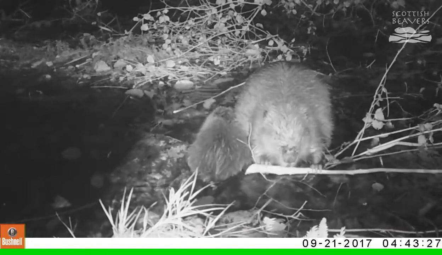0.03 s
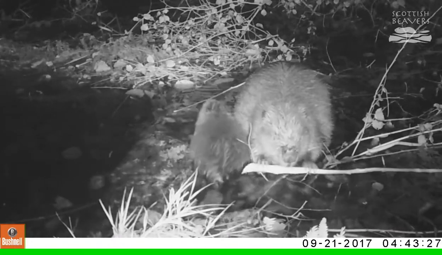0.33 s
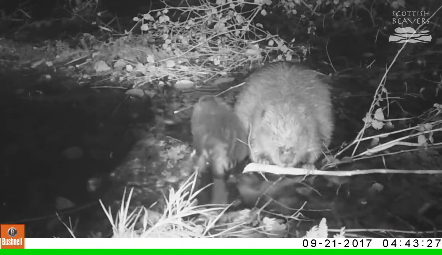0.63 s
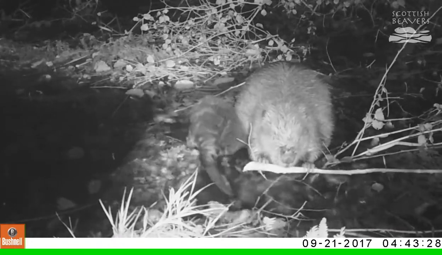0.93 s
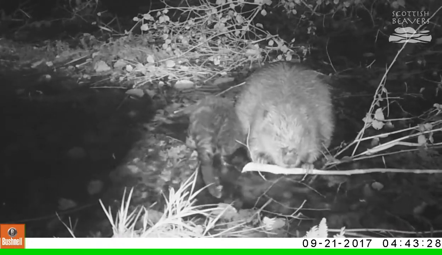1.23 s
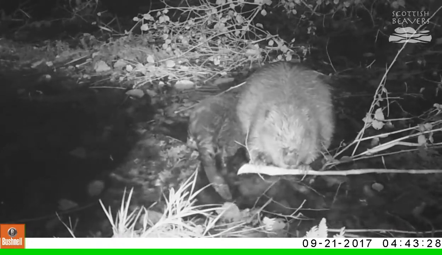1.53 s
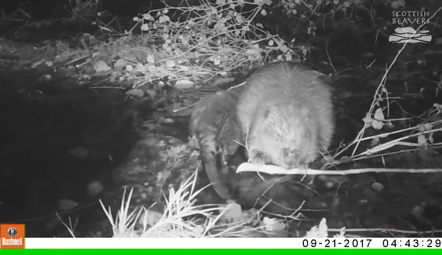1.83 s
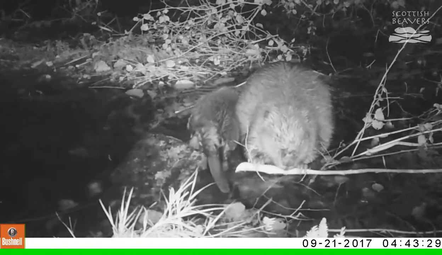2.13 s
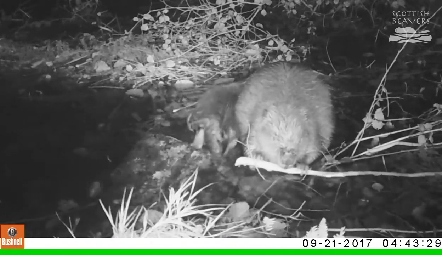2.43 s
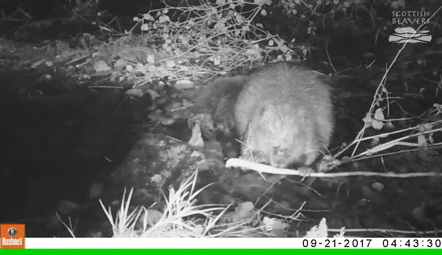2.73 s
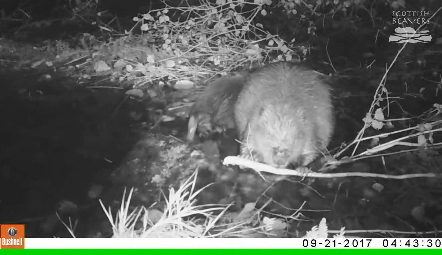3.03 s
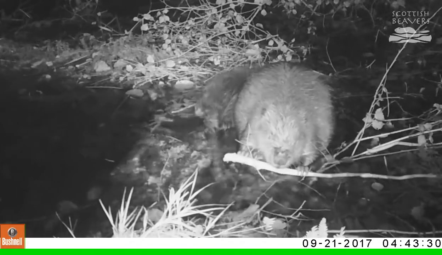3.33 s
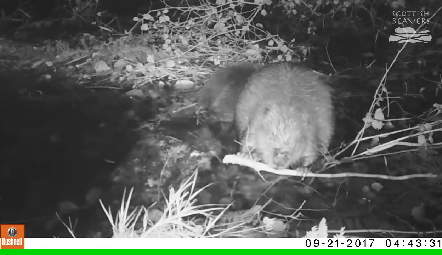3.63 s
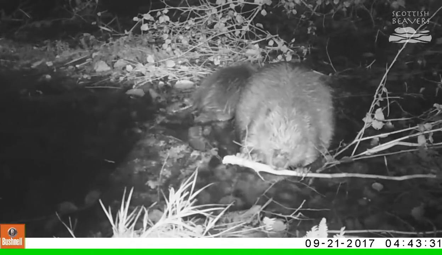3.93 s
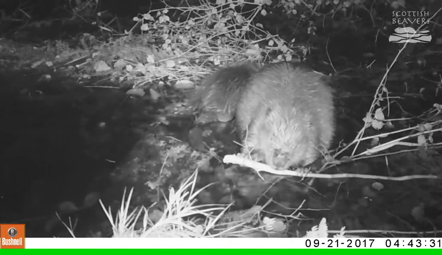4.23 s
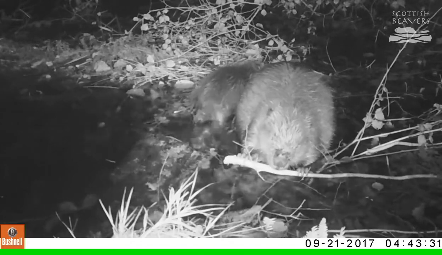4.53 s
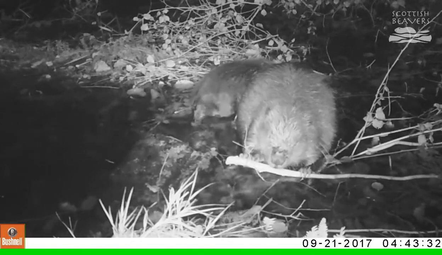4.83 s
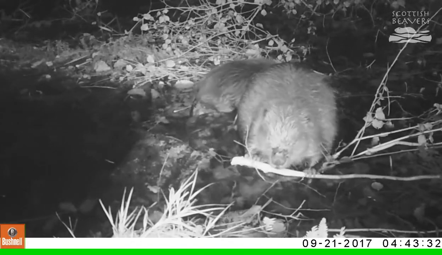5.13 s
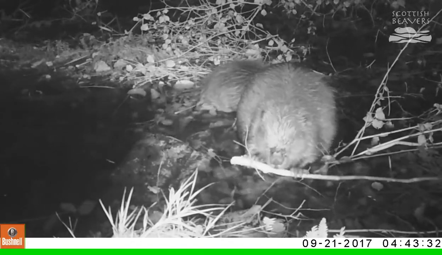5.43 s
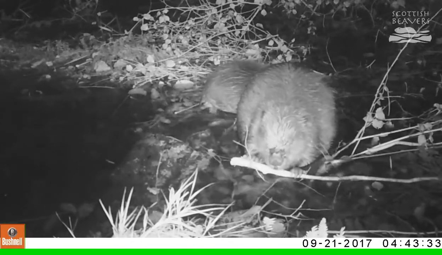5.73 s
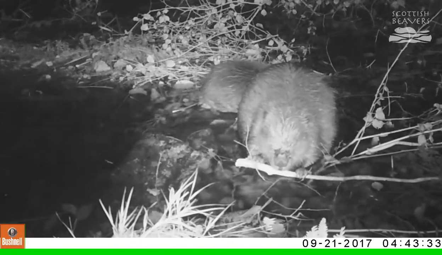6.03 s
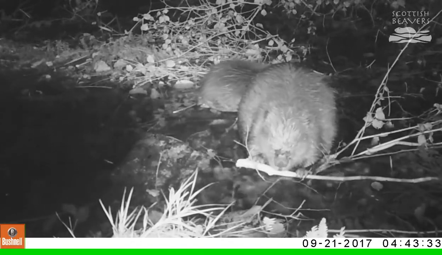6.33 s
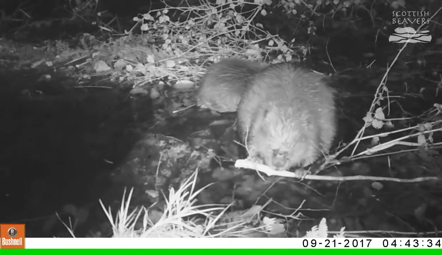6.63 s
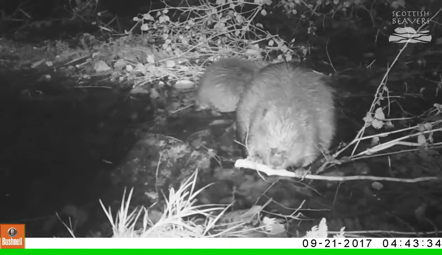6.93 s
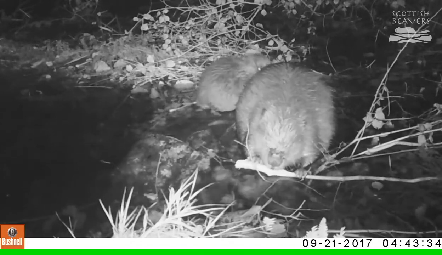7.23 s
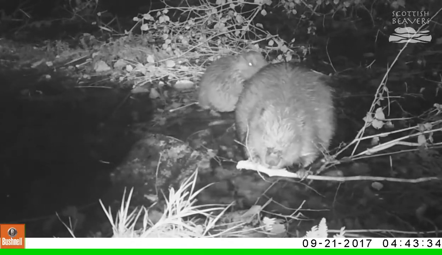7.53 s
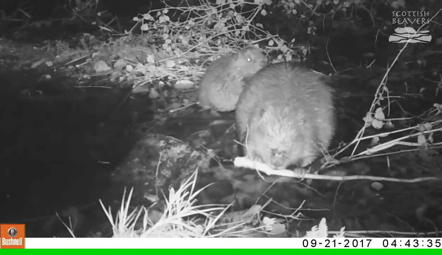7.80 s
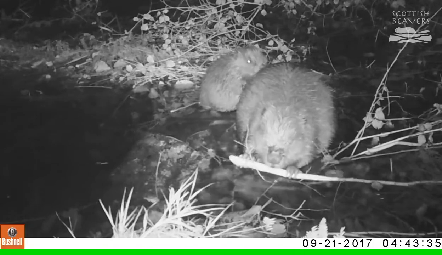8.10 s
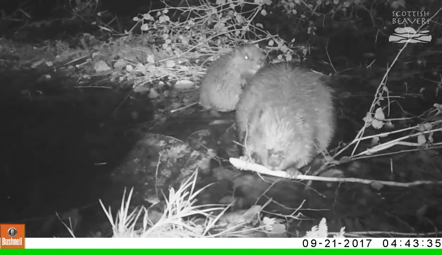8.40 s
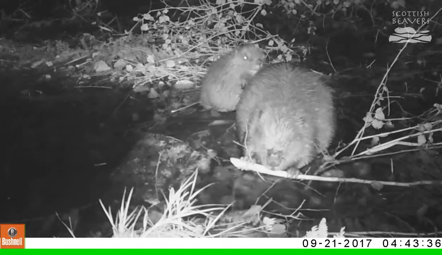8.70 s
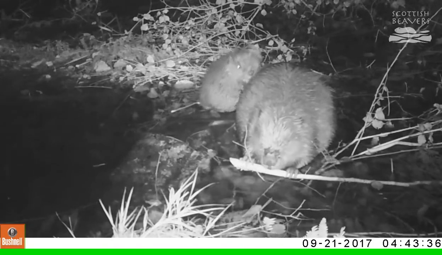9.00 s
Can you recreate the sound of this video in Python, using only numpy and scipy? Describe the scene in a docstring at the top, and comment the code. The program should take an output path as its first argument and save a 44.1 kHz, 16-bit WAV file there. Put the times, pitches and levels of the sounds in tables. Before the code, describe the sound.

A beaver gnaws a stick on a stream bank at night, a few metres from the microphone. First come scattered dry clicks, light tooth scrapes and small snaps of wood fibre. Midway there are three soft bumps and a brief tear of bark. Then the chewing settles into hollow, rasping bites, about five a second, each ending in a crisp chip. A steady low rumble and hiss lie under the quiet gnawing.

```python
"""A beaver gnaws a stick on a stream bank at night, a few metres away.
Its incisors first scrape, snap fibres and peel bark, then bite about five times a second, each bite a
rasp ending in a breaking chip. Slips and fractures ring the stick; slivers ring at their own pitch.
The bank scatters the gnawing faintly. Underneath: low rumble, steady hiss, three soft bumps."""
import sys
import numpy as np
from scipy import signal
from scipy.fft import rfft, irfft, next_fast_len
from scipy.io import wavfile

SR = 44100
rng = np.random.default_rng(int(sys.argv[2]) if len(sys.argv) > 2 else 0)


def wrap_up_sound(samples):
    """Save the sound to the file named by the first command line argument, as 16-bit audio."""
    columns = np.atleast_2d(samples).T
    # keep every value between -1 and 1, then stretch to whole-number steps
    tamed = np.clip(columns, -1, 1)
    steps = np.round(tamed * 32767).astype(np.int16)
    wavfile.write(sys.argv[1], SR, steps)


N = 408366

# night background spectrum (frequency [Hz], relative density [dB])
NIGHT_SPECTRUM = [(12, -2), (25, 1), (40, -1), (60, -4.5), (120, -10), (250, -16.5), (500, -24.5),
                  (1000, -32), (2000, -37), (4800, -41), (6300, -39.5), (7300, -40.5), (8900, -46),
                  (9400, -57), (10000, -56.5)]
# resonances of the stick in the jaws (frequency [Hz], width [Hz], gain [dB])
STICK_MODES = [(500, 99, 5.5), (786, 240, 4.5), (1190, 164, -1), (1397, 270, -2), (2304, 110, -5),
               (2605, 650, -3.5), (3225, 660, -2), (3630, 150, -3), (4130, 280, -2.5), (4800, 250, -3),
               (5765, 740, 4), (6480, 370, 5.5), (7660, 1050, 0.5), (8300, 1100, -6.5), (8950, 1700, -16)]
# centres of the knock, wood, tooth and edge bands (frequency [Hz])
BANDS_HZ = [1450, 3120, 6200, 8450]
# lone tooth scrapes (start [s], length [s], level before gain [dB], body [dB])
SCRAPES = [(0.114, 0.14, -76, -11), (0.291, 0.031, -61, 7), (0.384, 0.03, -63, -14),
           (0.456, 0.027, -63, -8), (0.847, 0.095, -65, -1), (1.155, 0.036, -59.5, 3),
           (1.828, 0.063, -60.5, -1), (2.193, .022, -58, 0), (2.634, 0.022, -61.5, 6),
           (2.885, 0.063, -59, 3), (3.679, 0.034, -57, 3), (4.031, 0.057, -62.5, 1), (4.096, 0.02, -59, 12),
           (4.12, 0.027, -60.5, -16), (4.238, 0.026, -60.5, -2), (5.099, 0.055, -57.5, 2.5),
           (5.36, 0.02, -59.5, 1), (5.565, 0.017, -55.5, -27), (5.869, 0.052, -57.5, 4),
           (6.019, 0.042, -61, 3), (7.978, 0.031, -64.5, -3)]
# slivers and twigs springing free (time [s], pitch [Hz], envelope peak [dB], decay [s])
SLIVERS = [(.1147, 6000, -40.5, .0006), (.2028, 5750, -43, .0006), (.3005, 1250, -44, .0006),
           (.4700, 1120, -37.5, 0.00058), (.6010, 4320, -35, 0.00072), (.6010, 5050, -35, 0.00054),
           (.8585, 3300, -42, .0004), (.8960, 1280, -45.5, .001), (2.0046, 550, -41, 0.0013),
           (2.0044, 1630, -28, 0.0007), (2.0044, 3220, -32, .0007), (2.0044, 2170, -34, 0.001),
           (2.0503, 5750, -23.5, 0.00042), (2.0508, 6600, -40, .0006), (2.0046, 4830, -39, .0005),
           (2.0505, 4060, -32, .00045), (2.5715, 6040, -28, 0.00041), (2.9350, 1020, -45, 0.0013),
           (3.5368, 6800, -41, 0.00054), (3.6245, 3450, -41.5, .0005), (4.8573, 2400, -39.5, 0.00052),
           (4.8575, 5650, -37, .0006), (4.8578, 6440, -33, .0006), (4.8615, 6370, -33, 0.00055),
           (4.936, 5300, -38, .0004), (5.2022, 1000, -36, 0.0011), (5.2028, 1450, -34.5, .001),
           (5.2034, 2560, -30, .0009), (5.2035, 4080, -36, .0007), (5.2033, 6340, -29.5, 0.0012),
           (5.209, 6600, -42, .0022), (8.429, 6250, -41, .0007), (8.4625, 6800, -40, .0007)]
# fibre snaps (time [s], 10 ms level before gain [dB], body [dB], edge [dB], splintering time [s])
CRACKS = [(0.3007, -51, -3, -14, 0.0018), (.4708, -52, 9, -14, .003), (0.5974, -47, 2, 7, .0006),
          (0.6012, -44.5, -2, 3, 0.0013), (.6057, -53, -4, 2, .0006), (.6115, -58, -3, -2, .001),
          (.6282, -54.5, -3, -7, .0008), (0.8596, -53, 4, -3, .004), (1.068, -56, -14, -4, .004),
          (1.8645, -46, 6, -13, 0.0033), (2.0047, -46, 2, -3, 0.002), (2.012, -53, -3, 1, .001),
          (2.051, -40, -10, -8, 0.0028), (2.0546, -47, -12, -6, .001), (2.060, -54, -10, -2, .003),
          (2.2, -48.5, -4, -13, .003), (2.25, -51.5, -12, -12, .003), (2.568, -47.5, 5, -4, 0.002),
          (2.572, -46, -1, -7, .0008), (2.5738, -49, -8, -8, .001), (2.804, -52, 0, -10, 0.0027),
          (3.263, -52, -2, -11, 0.0037), (3.342, -51.5, 6, -7, 0.0034), (3.591, -49, -10, 7, 0.0037),
          (3.6248, -52.5, 2, 0, 0.0032), (4.593, -50, 11, -4, 0.0027), (4.8582, -44.5, 8, -8, 0.003),
          (4.8625, -49, -7, -10, .002), (4.9365, -52, -2, -10, 0.001), (4.945, -41, -7, 10, .002),
          (4.952, -46.5, -7, 1, .0008), (5.2023, -46, -18, -12, .001), (5.2049, -41, -30, -12, .0015),
          (5.223, -54, -25, -20, .004), (5.8787, -49.5, 13, 1, .002), (6.097, -55, 2, -12, .002),
          (6.319, -50, 3, -6, 0.0018), (6.3306, -43.5, 5, -6, 0.0012), (6.3592, -46, -15, -12, 0.0032),
          (6.4862, -48.5, 0, -7, 0.0022), (6.573, -51, -4, -5, .004), (6.693, -53, -14, -2, .002),
          (6.933, -53.5, 9, -14, .002), (7.217, -50, -10, -10, .004), (7.620, -48.5, -12, -8, 0.00092),
          (7.864, -56, -14, -1, .002), (7.931, -52, -25, -8, .003), (8.231, -52.5, -22, -6, 0.0028),
          (8.383, -50, 4, -5, 0.0038), (8.428, -53, 1, -2, .0015), (8.4525, -50.5, -6, -1, .0015),
          (8.4925, -45.5, -9, -4.5, 0.0029), (8.506, -53, -11, 1, .003), (8.547, -49.5, 2, 3, 0.0018),
          (8.607, -48.5, 3, -6, .003), (8.778, -44.5, 1, 0, 0.0014), (8.825, -52, 2, -2, .002),
          (8.842, -50, 4, -2, .004), (8.985, -43.5, -3, -4, 0.0022)]
# soft bumps on the bank (time [s], pitch [Hz], envelope peak [dB], decay [s])
BUMPS = [(4.074, 250, -47, 0.0024), (4.111, 342, -39, 0.002), (4.255, 434, -40.5, 0.0026)]
# bark tears (time [s], peak before gain [dB])
TEARS = [(4.2893, -40), (4.2965, -41), (4.3037, -41), (4.32, -40), (4.332, -45), (4.3455, -33.5),
         (4.354, -38), (4.3675, -42), (4.3755, -42), (4.386, -42), (4.4085, -44)]
# resonances of the loose bark strip (frequency [Hz], width [Hz], gain [dB])
STRIP_MODES = [(2680, 260, 2), (3130, 220, -1.5), (5780, 300, 3.5), (6440, 140, 1)]
# bites (hardest push [s], half length [s], rasp before gain [dB], body [dB], chip time [s],
# chip before gain [dB], hollow pitch [ratio])
BITES = [(6.088, .015, -61, -3, 6.120, -45, 0.88), (6.31, 0.032, -56, -2, 6.337, -45.5, 0.82),
         (6.514, .025, -52.5, -0.5, 6.553, -44, 1.07), (6.729, 0.0097, -49.5, -2, 6.780, -45.5, 1.04),
         (6.959, 0.011, -49.5, 0, 6.998, -46, 0.94), (7.179, 0.021, -49.5, 1.5, 7.207, -48.5, 1.1),
         (7.387, 0.022, -49.5, 3.5, 7.421, -50.5, 1.02), (7.583, 0.021, -51, 0, 7.616, -49.5, 0.96),
         (7.784, 0.019, -49, 1, 7.806, -44.5, 0.98), (8.419, 0.01, -50, 0, 8.463, -55, 1.08),
         (8.586, .015, -55.5, 5, 8.629, -48, 0.84), (8.789, 0.014, -51, 4, 8.829, -47, 0.85),
         (8.994, 0.016, -48.5, 3, 9.042, -43, 0.91), (9.205, 0.016, -51, 2.5, 9.254, -47, 0.87)]
# hollow resonances of a deep bite (frequency [Hz], width [Hz], gain [dB])
HOLLOW_MODES = [(480, 110, -1.5), (770, 190, -6.5), (1230, 170, -10), (1480, 340, 0.5)]
# shaving under the teeth, ringing higher as the gnawing moves along (time [s], pitch [Hz])
SHAVING_PITCH = [(7.2, 3180), (8.6, 3670)]
# treble roll-off (frequency [Hz], gain [dB])
TREBLE_ROLLOFF = [(7800, 0), (8800, -1), (9400, -6), (10000, -12), (11000, -32.5)]


def undb(db):
    """Decibels to gain."""
    return 10 ** (np.asarray(db) / 20)


def add(track, sound, start_s):
    """Mix a sound into a track."""
    i = max(int(start_s * SR), 0)
    track[i:i + len(sound)] += sound[:max(len(track) - i, 0)]


def colour(x, points):
    """Filter by (frequency [Hz], gain [dB]) points on a log-frequency axis."""
    hz, db = np.transpose(points)
    n = next_fast_len(len(x))
    bins_hz = np.maximum(np.arange(n // 2 + 1) * SR / n, 1)
    gain = undb(np.interp(np.log(bins_hz), np.log(hz), db))
    return irfft(rfft(x, n) * gain, n)[:len(x)]


def walk(rate_hz, size):
    """Smooth random wander, spread near 1."""
    steps = np.arange(size) * rate_hz / SR
    knots = rng.standard_normal(int(steps[-1]) + 2)
    return np.interp(steps, np.arange(len(knots)), knots)


def night(level_db=-41.5, waver_db=0.35, waver_hz=18):
    """Steady low rumble under a barely wavering hiss."""
    noise = colour(rng.standard_normal(N), NIGHT_SPECTRUM)
    noise *= undb(level_db) / np.sqrt(np.mean(noise ** 2))
    rumble = colour(noise, [(150, 0), (900, -25)])
    hiss = noise - rumble
    return rumble + hiss * undb(waver_db * walk(waver_hz, N))


def fractures(rate_hz, spread_db, size):
    """Tiny random impulses: most weak, a few strong."""
    hits = rng.random(size) < rate_hz / SR
    signs = rng.choice([-1, 1], size)
    return hits * signs * undb(spread_db * np.minimum(rng.exponential(size=size), 3))


def ring(force, modes, detune):
    """Drive resonances, each randomly a little off pitch."""
    sound = np.zeros(len(force))
    for hz, width_hz, db in modes:
        hz = hz * (1 + detune * rng.standard_normal())
        sound += undb(db) * signal.lfilter(*signal.iirpeak(hz, hz / width_hz, fs=SR), force)
    return sound


def stick(force, tint_db, span_s, rms_db):
    """The stick rings; each grip shifts and recolours its modes. Energy equals rms_db held for span_s."""
    sound = ring(np.pad(force, (0, 512)), STICK_MODES, detune=.015)
    knock_db, wood_db, edge_db = tint_db
    sound = colour(sound, list(zip(BANDS_HZ, [knock_db, wood_db, 0, edge_db])))
    return sound * undb(rms_db) * np.sqrt(span_s * SR / np.sum(sound ** 2))


def nibbling(tick_hz=60, spread_db=2.5, bout_hz=5, bout_db=3):
    """Faint ticks of lips, paws and bark, in little bouts throughout."""
    force = fractures(tick_hz, spread_db, N) * undb(bout_db * np.tanh(walk(bout_hz, N)))
    return stick(force, tint_db=(-2, -2, -9), span_s=N / SR, rms_db=-73)[:N]


def bank_scatter(x, t60_s=0.064, wet_db=-12, gap_s=0.0025, size=11000):
    """Stones and plants return a short, thin scatter."""
    t = np.arange(size) / SR
    echoes = rng.standard_normal(size) * undb(-60 * t / t60_s) * (t > gap_s)
    echoes = colour(echoes / np.linalg.norm(echoes), [(2200, -7), (4000, 3), (6300, 3), (8500, -0.5)])
    return undb(wet_db) * signal.fftconvolve(x, echoes)[:N]


def grip(body_db, wood_db, edge_db, wood_share=0.62):
    """Tint of a contact: the more of the stick it moves, the more knock and wood."""
    return body_db, wood_db + wood_share * body_db, edge_db


def rasp(length_s, slip_hz=150, jitter=.35, scatter_db=4, puff_s=.003, drag=.16):
    """Incisors catch and slip unevenly; each slip tears a puff of fibres, pressure peaking mid-stroke."""
    n = max(int(length_s * SR), 256)
    gap_draw, level_draw = rng.standard_normal((64, 2)).T
    slips_s = np.cumsum(np.exp(jitter * gap_draw)) / slip_hz
    age_s = np.arange(n) / SR - (slips_s - slips_s[0] / 2)[:, None]
    puffs = undb(scatter_db * level_draw) @ ((age_s >= 0) * np.exp(-np.abs(age_s) / puff_s))
    pressure = np.interp(np.arange(n) / n, [0, .35, .53, 1], [.25, .85, 1, .45])
    return pressure * (drag + puffs) * fractures(rate_hz=5000, spread_db=2.5, size=n)


def scrapes(wood_db=3, edge_db=-2, gain_db=3.5):
    """Light, separate drags of the teeth over the bark."""
    out = np.zeros(N)
    for start_s, length_s, db, body_db in SCRAPES:
        sound = stick(rasp(length_s), grip(body_db, wood_db, edge_db), length_s, db + gain_db)
        add(out, sound, start_s)
    return out


def pings(rows, size=1500):
    """Sine bursts that swell within a few cycles and die almost as fast."""
    out = np.zeros(N)
    t = np.arange(size) / SR
    for start_s, hz, db, decay_s in rows:
        envelope = undb(db) * t / decay_s * np.exp(1 - t / decay_s)
        add(out, envelope * np.sin(2 * np.pi * hz * t), start_s)
    return out


def slivers():
    """Slivers and twigs spring free and ring at their own pitch."""
    return pings(SLIVERS)


def snap(lead_s, fall_s, rise_share=0.48, splinter_db=-11, size=700):
    """A fibre starts to tear, lets go in one jolt, then splinters."""
    t = np.arange(size) / SR - lead_s
    tearing = np.exp(np.minimum(t / (rise_share * fall_s), -t / fall_s))
    force = undb(splinter_db) * tearing * rng.standard_normal(size)
    force[np.argmax(tearing)] += 1
    return colour(force, [(500, -5), (1100, 5.5)])  # too brief to flex the whole stick


def cracks(lead_s=.003, wood_db=4.5, gain_db=-2):
    """Single fibres snap and ring the stick."""
    out = np.zeros(N)
    for time_s, db, body_db, edge_db, splinter_s in CRACKS:
        force = snap(lead_s, splinter_s)
        sound = stick(force, grip(body_db, wood_db, edge_db), span_s=.01, rms_db=db + gain_db)
        add(out, sound, time_s - lead_s)
    return out


def bumps():
    """Soft low bumps, likely the beaver's feet on the bank."""
    return pings(BUMPS)


def peel(tear_s=0.0026, gain_db=-2.5, size=700):
    """Bark comes away in small tears, each ringing the loose strip."""
    out = np.zeros(N)
    envelope = np.exp(-np.arange(size) / SR / tear_s)
    for time_s, db in TEARS:
        tear = ring(rng.standard_normal(size) * envelope, STRIP_MODES, detune=.01)
        # light strip: little knock or edge
        tear = colour(tear, [(1500, -12), (2400, -1.5), (6700, -1.5), (7500, -6)])
        add(out, tear / np.abs(tear).max() * undb(db + gain_db), time_s)
    return out


def crumble(pressure, notch_modes, slip_hz=135, jitter=.3, fade_db=12, catch_hz=200, catch_db=2):
    """Teeth judder through wood; each slip frees a fading spray of fractures that rings the notch."""
    n = len(pressure)
    cycles = np.cumsum(slip_hz * np.exp(jitter * walk(slip_hz, n))) / SR
    slip_phase = (cycles - cycles[np.argmax(pressure)] + 1 / 4) % 1
    judder = undb(catch_db * walk(catch_hz, n) - fade_db * slip_phase)
    force = pressure * judder * fractures(rate_hz=5000, spread_db=2.6, size=n)
    return force + ring(force, notch_modes, detune=.035)


def bites(wood_db=-3.5, edge_db=-7, rasp_gain_db=1.5, ease_s=.045, size=8000):
    """Each bite swells to a hard, hollow push and eases off; then the chip crumbles free."""
    chip_rise_s, chip_fall_s, chip_body_db, chip_gain_db = 0.007, 0.009, -4, 0.5
    shaving_width_hz, shaving_db = 280, 1
    out = np.zeros(N)
    lead_s = size / SR / 2
    t = np.arange(size) / SR - lead_s
    chip_pressure = np.exp(np.minimum(t / chip_rise_s, -t / chip_fall_s))
    for push_s, half_s, rasp_db, body_db, chip_s, chip_db, pitch in BITES:
        shaving_hz = np.interp(push_s, *np.transpose(SHAVING_PITCH))
        notch_modes = [(hz * pitch, width_hz, db) for hz, width_hz, db in HOLLOW_MODES]
        notch_modes.append((shaving_hz, shaving_width_hz, shaving_db))

        push_pressure = np.exp(-(np.maximum(t, 0) / ease_s) ** 2) / (1 + (t / half_s) ** 2)
        push_force = crumble(push_pressure, notch_modes)
        push = stick(push_force, (body_db, wood_db, edge_db), 2 * half_s, rasp_db + rasp_gain_db)
        add(out, push, push_s - lead_s)

        chip_force = crumble(chip_pressure, notch_modes)
        chip_tint_db = (body_db + chip_body_db, wood_db, edge_db)
        chip = stick(chip_force, chip_tint_db, span_s=.01, rms_db=chip_db + chip_gain_db)
        add(out, chip, chip_s - lead_s)
    return out


def scene():
    """Gnawing, its scatter, bumps and background; mono."""
    gnawing = cracks() + slivers() + scrapes() + bites() + peel() + nibbling()
    return (gnawing + bank_scatter(gnawing) + bumps() + night())[None]


def record(dry, cutoff_hz=11400):
    """The highs fade above 9 kHz and stop near 11 kHz."""
    lowpass = signal.ellip(8, .2, 70, cutoff_hz, fs=SR, output="sos")
    return signal.sosfilt(lowpass, colour(dry[0], TREBLE_ROLLOFF))[None]


dry = scene()
out = record(dry)
wrap_up_sound(out)
```